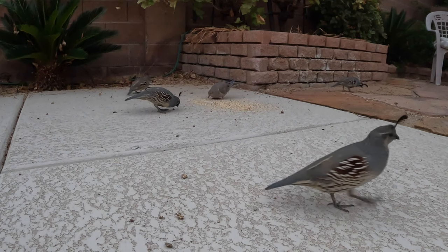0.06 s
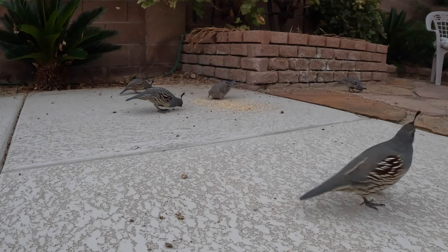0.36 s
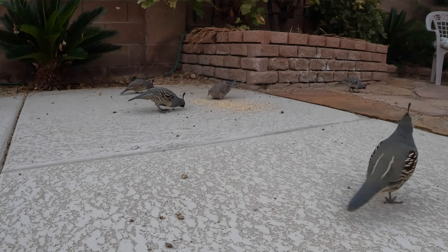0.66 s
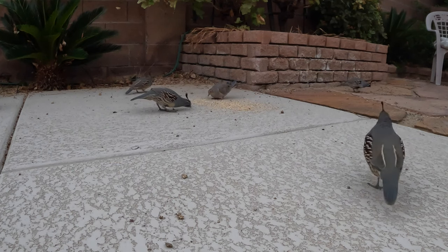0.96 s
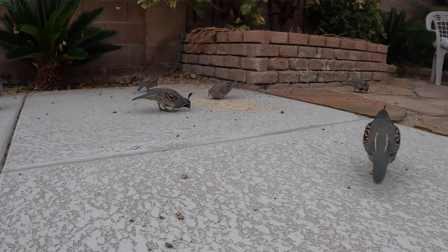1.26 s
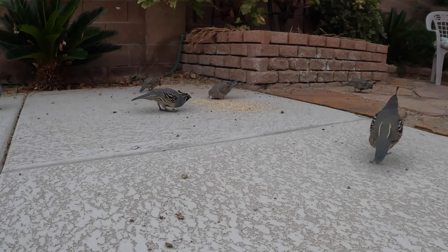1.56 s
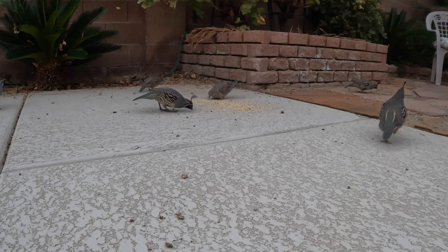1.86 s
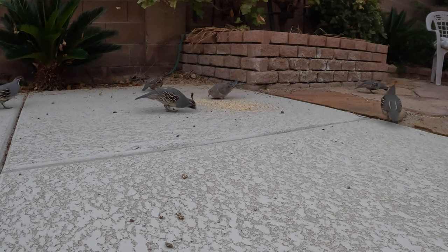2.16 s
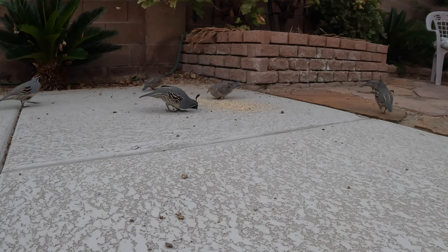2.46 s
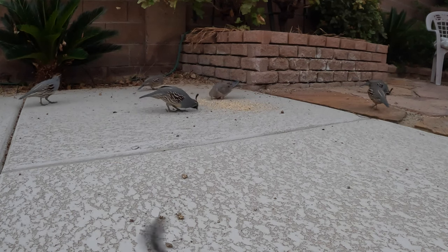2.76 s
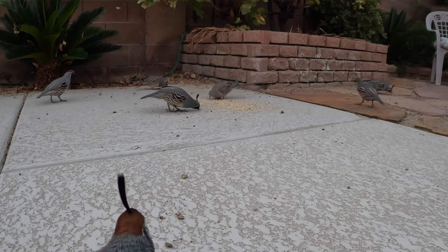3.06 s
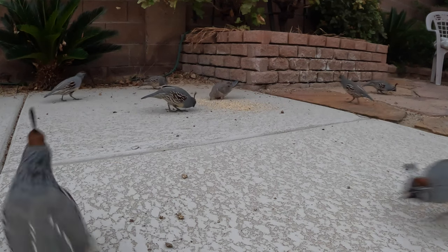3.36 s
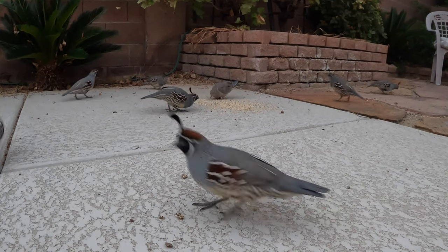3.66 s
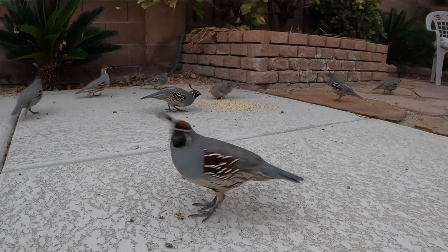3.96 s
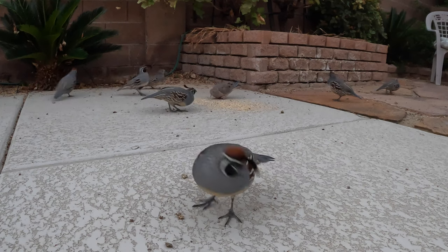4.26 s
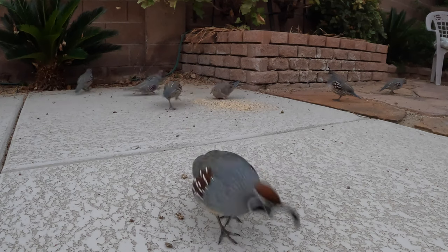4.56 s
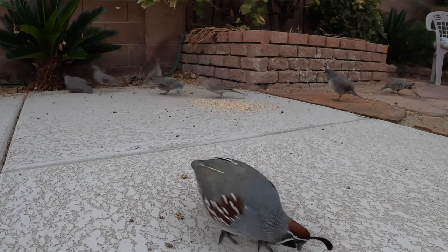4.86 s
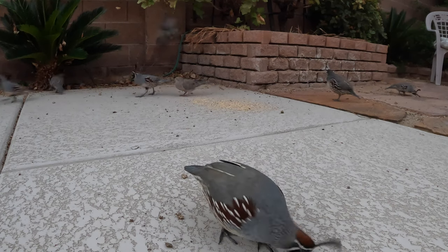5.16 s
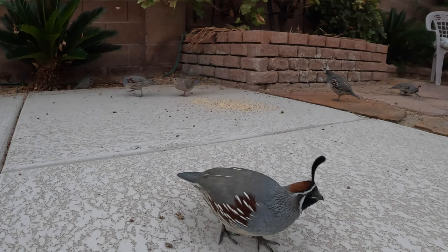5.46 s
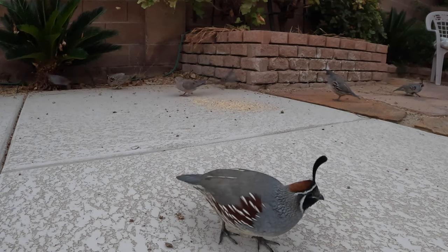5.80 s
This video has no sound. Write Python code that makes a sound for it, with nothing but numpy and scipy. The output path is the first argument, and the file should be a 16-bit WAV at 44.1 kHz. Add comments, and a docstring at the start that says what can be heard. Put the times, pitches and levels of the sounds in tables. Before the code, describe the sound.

A flock of quail coos and chirps softly in a backyard, with light beak ticks, feather rustles and a constant low machine hum.

```python
"""Quail feeding on a patio

A flock feeds on concrete in a walled backyard. Two birds up close sweep low coos into peeps while the
rest coo and chirp; each voice is a gliding syrinx tone coloured by throat and beak. Beaks and claws
tick on the slab and feathers rustle. Machines, probably air conditioners, throb against each other
over the rumble of the neighbourhood. The sound cuts out once, for an instant."""
import sys
import numpy as np
from scipy import signal
from scipy.fft import rfft, irfft
from scipy.io import wavfile
from scipy.ndimage import uniform_filter1d

SR = 44100
rng = np.random.default_rng(int(sys.argv[2]) if len(sys.argv) > 2 else 0)


def transcribe(signal):
    """Save signal, clipped to [-1, 1], as a 16-bit WAV file at the path in sys.argv[1]."""
    frames = np.atleast_2d(signal).T
    limited = np.clip(frames, -1, 1)
    pcm = np.round(limited * 32767).astype(np.int16)
    wavfile.write(sys.argv[1], SR, pcm)


N = 265923
TIME = np.arange(N) / SR
BINS = np.fft.rfftfreq(N, 1 / SR) + 1e-3

# The bed of distant rumble and air. Each row: frequency in Hz, relative level in dB.
RUMBLE_COLOUR = [(20, -14), (35, 4), (100, 2.5), (170, -2), (350, -9.5), (550, -21.5), (850, -30.5),
                 (1350, -28), (2000, -35), (4000, -44), (7500, -47.5), (9000, -58), (11500, -61.5),
                 (14000, -99.5)]
# The fader ride on that bed. Each row: time in seconds, gain in dB.
RUMBLE_RIDE = [(0, 0.5), (.8, 0.5), (2, -0.5), (3.2, -0.5), (4.4, -0.5), (6.03, 2)]
# The machines' tones. Each row: pitch in Hz, relative level in dB.
HUM_TONES = [(37.7, -45), (55.85, -35), (75.33, -37.5), (118, -51), (167.6, -60), (239, -57.5)]
# The fader ride on the hum. Each row: time in seconds, gain in dB.
HUM_RIDE = [(0, 3), (.8, -3), (1.8, 0.5), (2.8, 0.5), (3.7, 0), (4.7, -3.5), (5.2, 1), (6.03, -5.5)]
# Slaps off the garden walls. Each row: delay in seconds, relative level in dB.
WALL_SLAPS = [(.017, -18), (.043, -48.5), (.078, -32.5)]
# Scuffing feet and shaken feathers. Each row: centre and width in seconds, then the relative levels
# of the scuff and of its crisp treble in dB.
RUSTLE_BOUTS = [(2.307, 0.35, -68, -88), (3.452, 0.32, -66, -82), (3.745, 0.14, -65, -76),
                (4.144, 0.18, -68, -75), (4.5, 0.069, -59.5, -76), (4.688, 0.087, -63, -66),
                (4.827, 0.049, -64, -63), (4.945, 0.062, -58.5, -68), (5.36, 1, -65, -74.5),
                (5.83, 0.17, -56.5, -65), (6.017, 0.24, -60, -73)]
# Sweeps of a wing or foot. Each row: centre and width in seconds, level in dB, band centre and
# bandwidth in Hz.
WING_SWEEPS = [(3.633, .024, -58, 3300, 3000), (3.642, .016, -47, 6700, 7000),
               (5.79, .028, -58, 2300, 4000), (5.865, .14, -62, 2900, 3400), (5.86, .14, -61, 1300, 1000)]
# The ring of a peck. Each row: resonance in Hz, bandwidth in Hz.
PECK_RING = [(1900, 1230), (3500, 2900), (6400, 3800), (11200, 4000)]
# The featured beak and claw hits. Each row: start in seconds, relative level in dB, brightest
# frequency in Hz, left minus right in dB, decay in seconds.
PECK_HITS = [(.476, -57.5, 2900, -4, 0.004), (.867, -57.5, 3400, -8, 0.0019), (.9532, -54, 6860, -3, .001),
             (2.177, -62, 10000, 5, 0.00084), (2.329, -60, 6000, -12, .0012),
             (3.516, -53, 8000, -5, 0.0018), (3.583, -52, 6600, 6, 0.0015),
             (3.6167, -44.5, 4400, 15, 0.0011), (4.7015, -42.5, 7540, 7, .0011),
             (4.7075, -47, 6000, 2, .0007), (4.7533, -46, 9500, -5, 0.0021), (4.758, -48, 10000, -2, .001),
             (4.7715, -56, 6000, 2, .0009), (4.8024, -50, 9500, 0, .003), (4.816, -59, 9500, 0, 0.0014),
             (4.8355, -42.5, 7950, 2, .002), (4.8497, -51, 9000, 0, .0007), (4.9333, -48, 8550, -4, 0.002),
             (4.976, -57, 7000, 8, .0014), (4.994, -52, 5500, 0, .0008), (5.098, -47.5, 9000, 0, .0008),
             (5.1375, -50, 7500, 0, .0008), (5.198, -55, 3400, 0, 0.0033),
             (5.2915, -40.5, 3840, -2, 0.0007), (5.3917, -53, 7000, 0, .001), (5.4977, -52, 6400, 0, .001),
             (5.5593, -46.5, 7850, 3, 0.00088), (5.679, -37.5, 1490, 0, 0.0017),
             (5.691, -37.5, 1800, 6, 0.002), (5.701, -47, 1900, -5, 0.0029), (5.746, -47, 2600, 1, 0.0044),
             (5.778, -45, 1900, 2, 0.0079), (5.801, -43, 2400, 1, 0.0037), (5.8296, -50, 7500, 5, .003),
             (5.8425, -48, 4500, 0, .0007), (5.849, -40, 3000, 2, .0014), (5.854, -51, 5000, 0, .001),
             (5.881, -50, 3220, 0, 0.0033), (5.894, -53, 3570, 2, 0.0014), (5.907, -45.5, 3330, 13, 0.0024),
             (5.9187, -40, 2960, -1, 0.0018), (5.942, -61, 3600, 0, 0.0022),
             (6.004, -43.5, 2880, 4, 0.0034)]
# What throat and beak do to the flock's overtones. Each row: frequency in Hz, gain in dB.
FLOCK_THROAT_EQ = [(800, -17), (1100, -14.5), (1400, -2), (1750, -8), (2300, -10.5), (3200, -8.5),
                   (4300, -21.5), (5800, -6.5), (7000, -26.5), (13000, -53)]
# Throat notches in a breaking voice. Each row: multiple of the notch edge frequency, gain in dB.
THROAT_NOTCHES = [(1, 1.5), (1.15, -13), (1.55, 1), (2, -9), (2.1, 3.5)]
# What throat and beak do to the close birds' overtones. Each row: frequency in Hz, gain in dB.
NEAR_THROAT_EQ = [(800, -20), (1100, -7), (1400, 3), (1750, -8), (2050, -29), (2250, -22.5), (2800, -6.5),
                  (3650, -10.5), (4400, -14), (5200, -10), (5900, -19.5), (6600, -15), (7400, -11),
                  (9000, -24.5), (11000, -27)]
# Plain coos with no peep. Each row: start and length in seconds, pitch in Hz, relative level in dB.
PLAIN_COOS = [(0.033, 0.11, 364, -51), (0.238, 0.15, 369.3, -56), (0.427, 0.21, 412.4, -49.5),
              (0.643, 0.11, 297.5, -49.5), (0.914, 0.17, 358, -49.5), (1.124, .11, 366.8, -50),
              (1.21, 0.03, 647, -60.5), (3.302, 0.08, 717, -60.5), (6.013, .04, 511, -48)]
# The flock's chirps. Each row: time of the top, then climb, hold and fall lengths in seconds; start,
# top and end pitch in Hz; lateness of the climb as an exponent; relative climb, tip, fall and octave
# levels in dB; overtone roll-off in dB per octave; hoarseness (0 is clean).
CHIRPS = [ (1.855, 0.2, 0.00091, 0.025, 386, 783, 391, 1.84, -48, -55.5, -37.5, -2.5, 24, 0.22),
          (3.806, 0.1, 0.021, 0.017, 937, 2223, 1210, 0.92, -59, -49, -49.5, 3, 22, 0.5),
          (3.91, 0.042, 0.0033, 0.014, 564, 813, 610, 1.1, -60.5, -61.5, -60, 8.5, 24, 1.13),
          (4.452, 0.023, .002, 0.0036, 529, 776, 760, 0.8, -52, -59, -65, 0, 20, 0.5),
          (4.475, 0.048, 0.018, 0.011, 1594, 2624, 2530, 0.78, -63, -51, -48.5, 0, 18, 0.48),
          (4.476, 0.09, .013, 0.0126, 996, 1927, 1085, .8, -53.5, -51.5, -47.5, 1, 16, 0.67),
          (5.092, .063, .009, 0.013, 542.4, 1028, 820, 1.2, -51.5, -47.5, -42, -1, 18, 0.42),
          (5.402, 0.038, 0.013, 0.018, 846, 1328, 833, .8, -59, -67, -44, -3, 22, 0.65),
          (5.609, 0.01, 0.025, 0.037, 589, 571, 460, 0.81, -44, -43.5, -45, 4.5, 11.5, 0), ]
# Chirps where the voice breaks. Each row: time of the top and climb length in seconds; start, break,
# top and landing pitch in Hz; lateness of the climb as an exponent; relative start, break, tip and
# landing levels in dB; octave before and after the break in relative dB; notch edge in Hz; overtone
# roll-off in dB per octave; hoarseness.
BREAKING_CHIRPS = [ (.227, 0.073, 638, 995, 1945, 1010, 3.1, -45, -51.5, -54.5, -52, -7, 6, 3620, 12, 0.24),
                   (2.236, 0.099, 523.5, 891, 1656, 556, 2.1, -47.5, -46, -48.5, -37, 4.5, 2.5, 1710, 42, 0.17),
                   (4.361, 0.15, 490.4, 872, 1140, 724, 2.7, -54.5, -59, -63, -50.5, 4, -3, 1750, 18, 0.54),
                   (4.885, .145, 616.5, 1089, 1727, 683, 3.8, -52.5, -54, -53, -56, 3.5, 4.5, 1770, 8, 0.49),
                   (5.152, 0.071, 648.6, 951, 1660, 854, 2.6, -52, -49, -61, -46.5, 1.5, -1, 2050, 10.5, 0.48),
                   ]
# The two close birds. Each row: time of the peep's top and coo length in seconds; coo and top pitch in
# Hz; relative coo, peep and octave levels in dB; overtone roll-off in dB per octave; beak resonance
# and sheen in dB; whether the peep arches over.
COO_PEEPS = [ (2.488, 0.068, 442.6, 907, -45, -43, 3.5, 8, 3, 2, False),
             (2.714, 0.073, 398.6, 726, -45.5, -41, -6, 7, 1, 4, True),
             (2.980, 0.066, 436, 907, -43, -40, 2, 2.5, -7, -2.5, False),
             (3.254, 0.067, 397.3, 742, -40.5, -38, -5.5, 7.5, 9.5, 7, True),
             (3.553, 0.072, 438, 918, -44.5, -39.5, 5, 2.5, -6.5, 5.5, False), ]

TOP_HZ = 14000
FLOCK_PAN_DB, NEAR_PAN_DB = -1.2, -3.5  # left minus right
ATTACK_S, ONSET_DB, RELEASE_DB = 0.0042, -4.5, -7.5  # a chirp's soft ends
TIP_LATENESS, TIP_OCTAVE_DB, TIP_ARCH_SHARE = 4.1, -2, 0.058  # its tip is late, purer and bends up
LEAP_S, DROP_S, LANDING_S = .018, .013, .005  # the stages of a voice break
WHISTLE_OCTAVE_DB, WHISTLE_DULL_DB, LANDING_OCTAVE_DB = -11, -2, 5  # thin whistle, reedy landing
SCOOP_S, SCOOP_SHARE, SCOOP_DB = 0.0083, 0.12, -11  # a close coo scoops into its note
SAG_SHARE, SAG_DB, COO_OCTAVE_DB = 0.0338, -3.5, -3.5  # then sags, its octave held back
SWEEP_S, PEEP_LATENESS = 0.041, 3.3  # the effort comes late in the sweep to the peep
ARCH_END_S, CUT_END_S, END_LIFT_DB = 0.012, 0.013, 1.5  # a small push as the peep ends
ARCH_HOARSE, CUT_HOARSE = 0.14, 0.84  # arched peeps are clear, cut ones rougher
BEAK_HZ, SHEEN_HZ = 5100, 7400  # two resonances that change with the opening of the beak
OPENING_DULL_DB, CLOSING_DULL_DB = 6, 3  # extra roll-off per octave as the beak opens and closes


def undb(db):
    """Decibels to gain."""
    return 10 ** (np.asarray(db) / 20)


def unit(x):
    """Scale to rms 1."""
    return x / np.sqrt(np.mean(x ** 2))


def gain_at(hz, points):
    """Read the gain off an EQ curve of (Hz, dB) points."""
    f, db = np.transpose(points)
    return undb(np.interp(np.log(hz), np.log(f), db))


def band(x, hz, width_hz):
    """The same resonant band-pass twice over, for steep sides."""
    peak = signal.iirpeak(hz, hz / width_hz, fs=SR)
    return signal.lfilter(*peak, signal.lfilter(*peak, x))


def smooth(x, samples):
    """Two moving averages, then rms 1."""
    return unit(uniform_filter1d(uniform_filter1d(x, samples), samples))


def walk(rate_hz):
    """A smooth random modulator with rms 1."""
    step = int(SR / rate_hz)
    return smooth(np.repeat(rng.standard_normal(N // step + 1), step)[:N], step)


def swell(centre_s, width_s):
    """A bell-shaped fade up and down."""
    return np.exp(-2 * ((TIME - centre_s) / width_s) ** 2)


def during(start_s, end_s):
    """The sample times between two moments."""
    return TIME[(TIME > start_s) & (TIME < end_s)]


def pan(db):
    """Left and right gains for a level difference."""
    return undb([[db / 2], [-db / 2]])


def spread(mid, side):
    """Mid and side to left and right."""
    return np.array([mid + side, mid - side])


def place(x, lag_ms):
    """The sound reaches the right ear a little later."""
    return np.array([x[0], irfft(rfft(x[1]) * np.exp(-2j * np.pi * BINS * lag_ms / 1000), N)])


def neighbourhood(level_db=-39.5, rumble_flicker_db=2.0, air_flicker_db=0.97):
    """Far traffic and air: octave bands that waver on their own, steadier and wider in the treble."""
    colour = gain_at(BINS, RUMBLE_COLOUR)
    width = gain_at(BINS, [(50, -21), (125, -22), (300, -11), (1000, -5.5), (2500, -3.5), (6000, -2)])
    out = 0
    for octave in range(10):
        share = np.sqrt(np.maximum(1 - abs(np.log2(BINS / 30) - octave), 0))
        mid, side = (irfft(rfft(rng.standard_normal(N)) * colour * share * w, N) for w in (1, width))
        flicker_db = np.interp(octave, [3, 5], [rumble_flicker_db, air_flicker_db])
        out = out + spread(mid, side) * undb(flicker_db * walk(7))
    return unit(out) * undb(level_db + np.interp(TIME, *np.transpose(RUMBLE_RIDE)))


def machines(waver_db=1.33, drift_hz=0.043):
    """Low tones of separate machines beat into a fast throb."""
    hum = 0
    for hz, db in HUM_TONES:
        phase = 2 * np.pi * (np.cumsum(hz + drift_hz * walk(2.96)) / SR + rng.random())
        hum = hum + np.sqrt(2) * np.sin(phase) * undb(db + waver_db * walk(5.98))
    ride = undb(np.interp(TIME, *np.transpose(HUM_RIDE)))
    return place(hum * ride * pan(-.3), lag_ms=0.026)


def walls(x, wet_db, echo_db, t60_s=0.46, dull_hz=4000):
    """The yard answers with a few slaps and a short diffuse tail, both darker than the source."""
    t = TIME[:SR // 2]
    dull = signal.butter(1, dull_hz, fs=SR)
    envelope = undb(-60 * t / t60_s) * np.minimum(t / 0.013, 1)
    tail = signal.lfilter(*dull, rng.standard_normal((2, len(t))) * envelope)
    tail *= undb(wet_db) / np.sqrt(np.sum(tail ** 2) / 2)
    slaps = np.zeros_like(tail)
    for delay_s, db in WALL_SLAPS:
        for ear in range(2):
            slaps[ear, int(delay_s * SR) + rng.integers(10)] = undb(db + echo_db)
    return signal.fftconvolve(x, tail + signal.lfilter(*dull, slaps), axes=1)[:, :N]


def murmur(count=16, low_hz=273.1, high_hz=362.8, softest_db=-54.0, range_db=7.4):
    """Birds further off keep in touch with short, pure, gently rising coos."""
    out = np.zeros(N)
    for k, (when, height, length, size) in enumerate(rng.random((count, 4))):
        start_s = (k + when) * TIME[-1] / count
        progress = (TIME - start_s) / (.1 + 0.045 * length)
        on = (progress > 0) & (progress < 1)
        hz = (low_hz + height * (high_hz - low_hz)) * (1 + 0.053 * progress[on])
        envelope = np.sqrt(np.sin(np.pi * progress[on])) * undb(softest_db + range_db * size)
        out[on] += np.sin(2 * np.pi * np.cumsum(hz) / SR) * envelope
    return out * pan(0)


def scratches(hz, width_hz, grain_db):
    """Friction in many tiny catches of uneven size, slightly different at each ear."""
    catches = undb(grain_db * np.minimum(0.62 * walk(900) + 1.04 * walk(150), 2.6))
    mid, side = (unit(band(rng.standard_normal(N) * catches, hz, width_hz)) for _ in range(2))
    return spread(mid, 0.5 * side)


def rustle(scuff_trim_db=-4, crisp_trim_db=-2):
    """Feet scuff the slab; now and then a wing sweeps over the flank."""
    scuff = sum(undb(db + scuff_trim_db) * swell(s, width_s) for s, width_s, db, _ in RUSTLE_BOUTS)
    crisp = sum(undb(db + crisp_trim_db) * swell(s, width_s) for s, width_s, _, db in RUSTLE_BOUTS)
    out = scratches(3700, 6200, grain_db=3.0) * scuff + scratches(10500, 3400, grain_db=5.0) * crisp
    for s, width_s, db, hz, width_hz in WING_SWEEPS:
        out += scratches(hz, width_hz, grain_db=-1.1) * undb(db) * swell(s, width_s)
    return out


def faint_pecks(count=30, base_db=-69, range_db=9.0, nearing_db=12.5, low_hz=2800, high_hz=7000,
                pan_db=5.0, decay_s=0.0023):
    """Hit rows for the rest of the flock, pecking at random and louder as the birds come closer."""
    hits = []
    for k, (when, size, bright, side) in enumerate(rng.random((count, 4))):
        start_s = (k + when) * TIME[-1] / count
        db = base_db + range_db * size + nearing_db * k / count
        brightest_hz = low_hz * (high_hz / low_hz) ** bright
        hits.append((start_s, db, brightest_hz, pan_db * (2 * side - 1), decay_s))
    return hits


def pecks(hits, rise_s=0.00008, grit_s=0.012, grit_db=-22, focus_db_per_octave=14):
    """Beak or claw meets concrete: a hard tick, then a short skitter of grit."""
    t = TIME[:2048]
    out = np.zeros((2, N + len(t)))
    for start_s, db, brightest_hz, pan_db, decay_s in hits:
        attack = 1 - np.exp(-t / rise_s)
        envelope = attack * (np.exp(-t / decay_s) + undb(grit_db) * np.exp(-t / grit_s))
        tick = 0
        for hz, width_hz in PECK_RING:
            makeup = np.sqrt(2 * SR / np.pi / width_hz)
            ring = band(rng.standard_normal(len(t)) * envelope, hz, width_hz) * makeup
            tick = tick + ring * undb(db - focus_db_per_octave * abs(np.log2(hz / brightest_hz)))
        i = int(start_s * SR)
        out[:, i:i + len(t)] += tick * pan(pan_db)
    return out[:, :N]


def coo(start_s, length_s, hz, db, octave_db=-9, roll_db=30, ends_db=-4, hoarse=0.7):
    """Voice curves for one soft, nearly pure note, loudest in the middle."""
    t = during(start_s, start_s + length_s)
    ends = (2 * (t - start_s) / length_s - 1) ** 2
    return t, hz, db + ends_db * ends, octave_db, roll_db, hoarse, FLOCK_THROAT_EQ, FLOCK_PAN_DB


def chirp(top_s, climb_s, hold_s, fall_s, start_hz, top_hz, end_hz, lateness,
          climb_db, tip_db, fall_db, octave_db, roll_db, hoarse):
    """Voice curves: the period of the syrinx shortens up to the tip, then snaps back as it lets go."""
    start_s = top_s - climb_s
    t = during(start_s, top_s + hold_s + fall_s)
    up = np.minimum((t - start_s) / climb_s, 1) ** lateness
    down = np.maximum(t - top_s - hold_s, 0) / fall_s
    arch = 1 + TIP_ARCH_SHARE * np.sin(np.pi * np.clip((t - top_s) / hold_s, 0, 1))
    period = (1 - up) / start_hz + (up - down) / top_hz + down / end_hz
    late_db = np.interp(down, [0, .5, 1], [tip_db, fall_db, fall_db + RELEASE_DB])
    db = climb_db + (late_db - climb_db) * up ** TIP_LATENESS
    db += ONSET_DB * np.exp((start_s - t) / ATTACK_S)
    octave_db += TIP_OCTAVE_DB * np.maximum(up ** TIP_LATENESS - 2 * down, 0)
    return t, arch / period, db, octave_db, roll_db, hoarse, FLOCK_THROAT_EQ, FLOCK_PAN_DB


def notched_throat(edge_hz):
    """The flock's throat EQ with two notches carved above an edge."""
    notches = [(edge_hz * ratio, db) for ratio, db in THROAT_NOTCHES]
    corners = sorted(hz for hz, _ in FLOCK_THROAT_EQ + notches)
    return [(hz, 20 * np.log10(gain_at(hz, FLOCK_THROAT_EQ) * gain_at(hz, notches))) for hz in corners]


def breaking_chirp(top_s, climb_s, start_hz, break_hz, top_hz, land_hz, lateness, start_db, break_db,
                   tip_db, land_db, octave_db, late_octave_db, edge_hz, roll_db, hoarse):
    """Voice curves: a climb breaks, leaps to a thin whistle, then drops onto a short reedy note."""
    break_s, land_s = top_s - LEAP_S, top_s + DROP_S
    start_s = break_s - climb_s
    t = during(start_s, land_s + LANDING_S)
    up = np.minimum((t - start_s) / climb_s, 1) ** lateness
    leap = np.sin(np.pi / 2 * np.clip((t - break_s) / LEAP_S, 0, 1)) ** 2
    drop = np.sin(np.pi / 2 * np.clip((t - top_s) / DROP_S, 0, 1)) ** 2
    hz = start_hz * (break_hz / start_hz) ** up
    hz *= (top_hz / break_hz) ** leap * (land_hz / top_hz) ** drop
    db = start_db + (break_db - start_db) * up + (tip_db - break_db) * leap + (land_db - tip_db) * drop
    db += ONSET_DB * np.exp((start_s - t) / ATTACK_S)
    db += RELEASE_DB * np.maximum(t - land_s, 0) / LANDING_S
    octave_db += (late_octave_db - octave_db) * np.minimum(2 * leap, 1)
    octave_db += WHISTLE_OCTAVE_DB * (leap - drop) ** 2 + LANDING_OCTAVE_DB * drop
    roll_db += WHISTLE_DULL_DB * leap
    return t, hz, db, octave_db, roll_db, hoarse, notched_throat(edge_hz), FLOCK_PAN_DB


def coo_and_peep(top_s, coo_s, coo_hz, top_hz, coo_db, peep_db, octave_db, roll_db,
                 beak_db, sheen_db, arches):
    """Voice curves: a held coo sweeps up into a peep that arches over or is cut as it levels out."""
    start_s = top_s - SWEEP_S - coo_s
    end_s, ending_s = (top_s + ARCH_END_S, ARCH_END_S) if arches else (top_s, CUT_END_S)
    t = during(start_s, end_s)
    scoop = np.exp((start_s - t) / SCOOP_S)
    sag = np.minimum((t - start_s) / coo_s, 1)
    sweep = np.maximum(1 + (t - top_s) / SWEEP_S, 0)
    ending = np.maximum(1 + (t - end_s) / ending_s, 0) ** 2
    climb = np.sin(np.pi / 2 * sweep) ** (1 if arches else 2)
    effort = np.sin(np.pi / 2 * np.minimum(sweep, 1)) ** PEEP_LATENESS
    low_hz = coo_hz * (1 - SCOOP_SHARE * scoop - SAG_SHARE * sag)
    low_db = coo_db + SCOOP_DB * scoop + SAG_DB * sag
    hz = low_hz * (top_hz / low_hz) ** climb
    db = low_db + (peep_db - low_db) * effort + END_LIFT_DB * ending
    octave_db += COO_OCTAVE_DB * (1 - effort)
    roll_db += OPENING_DULL_DB * (1 - effort) + CLOSING_DULL_DB * ending
    beak_eq = [(3000, 0), (BEAK_HZ, beak_db), (6000, 0), (SHEEN_HZ, sheen_db)]
    throat = [(f, level + 20 * np.log10(gain_at(f, beak_eq))) for f, level in NEAR_THROAT_EQ]
    hoarse = ARCH_HOARSE if arches else CUT_HOARSE * effort
    return t, hz, db, octave_db, roll_db, hoarse, throat, NEAR_PAN_DB


def quail(calls, pressed_hz, mellow_db, jitter, shimmer_db, rasp, gain_db, blur=0.66, edge_s=0.002942):
    """Play voice curves: the syrinx glides, its harmonics lighting up at the throat's resonances."""
    # hoarseness scales the shake in pitch and level, and the blur on each harmonic
    waver = jitter * walk(600)
    flutter_db = shimmer_db * np.minimum(walk(160), .5)
    grain = rasp * walk(1500)
    order = np.arange(1, 15)[:, None]
    out = np.zeros((2, N))
    for times, hz, db, octave_db, roll_db, hoarse, throat, pan_db in calls:
        on = (TIME > times[0] - edge_s) & (TIME < times[-1] + edge_s)
        t = TIME[on]
        log_hz, db, octave_db, roll_db, hoarse = (
            np.interp(t, times, np.broadcast_to(curve, times.shape))
            for curve in (np.log(hz), db, octave_db, roll_db, hoarse))
        pitch = np.exp(uniform_filter1d(log_hz, size=180) + hoarse * waver[on])
        partials = order * pitch
        # below pressed_hz the voice slackens towards a pure hum
        slope_db = roll_db + mellow_db * np.maximum(np.log2(pressed_hz / pitch), 0)
        gains = gain_at(partials, throat) * undb(-slope_db * np.log2(order / 2))
        gains[0] = 1
        gains[1] *= undb(octave_db)
        eddies = blur * hoarse * np.sqrt(order) * smooth(rng.standard_normal(partials.shape), 90)
        phase = 2 * np.pi * np.cumsum(partials, axis=1) / SR + eddies
        tone = np.sum(gains * (partials < TOP_HZ) * np.sin(phase), axis=0)
        fade = np.clip((np.minimum(t - times[0], times[-1] - t) + edge_s) / (2 * edge_s), 0, 1)
        level = undb(db + hoarse * flutter_db[on] + gain_db) * (1 + hoarse * grain[on])
        out[:, on] += np.sqrt(2) * tone * fade * level * pan(pan_db)
    return out


def scene():
    """The mix: two close birds and their flock, each sent to the walls, over hum and rumble."""
    near_voice = dict(pressed_hz=740, mellow_db=29, jitter=0.034, shimmer_db=1.5, rasp=0.22, gain_db=2)
    arching_bird = quail([coo_and_peep(*row) for row in COO_PEEPS if row[-1]], **near_voice)
    cutting_bird = quail([coo_and_peep(*row) for row in COO_PEEPS if not row[-1]], **near_voice)
    calls = [chirp(*row) for row in CHIRPS]
    calls += [breaking_chirp(*row) for row in BREAKING_CHIRPS]
    calls += [coo(*row) for row in PLAIN_COOS]
    flock = quail(calls, pressed_hz=600, mellow_db=12, jitter=0.027, shimmer_db=5, rasp=0.28,
                  gain_db=1.16)
    distant = place(flock + murmur(), lag_ms=0.037)
    close = place(arching_bird, lag_ms=0.016) + pecks(PECK_HITS + faint_pecks()) + rustle()
    beside = place(cutting_bird, lag_ms=0.03)
    echo = walls(close, wet_db=-18, echo_db=-1)
    echo += walls(beside, wet_db=-18.5, echo_db=9)
    echo += walls(distant, wet_db=-19, echo_db=5.5)
    return close + beside + distant + echo + machines() + neighbourhood()


def record(dry):
    """The sound cuts out for an instant, and a steep low-pass takes off the very top."""
    mute_from_s, mute_to_s = 4.14, 4.177
    gate = uniform_filter1d(1. * ((TIME < mute_from_s) | (TIME > mute_to_s)), size=40)
    return signal.sosfilt(signal.ellip(8, .2, 70, TOP_HZ, fs=SR, output="sos"), dry * gate)


dry = scene()
out = record(dry)
transcribe(out)
```